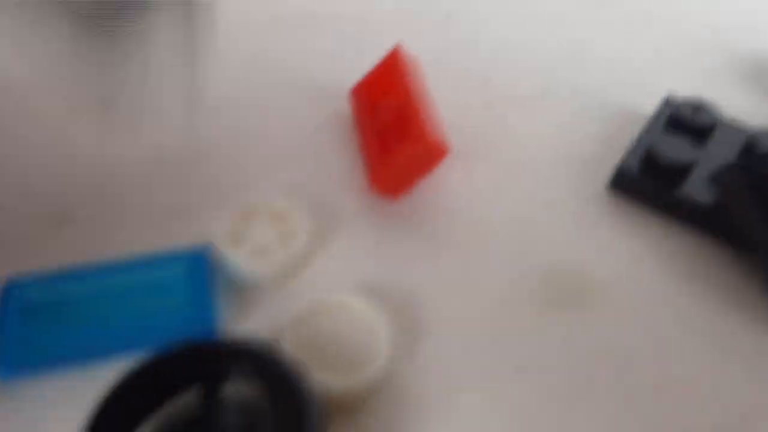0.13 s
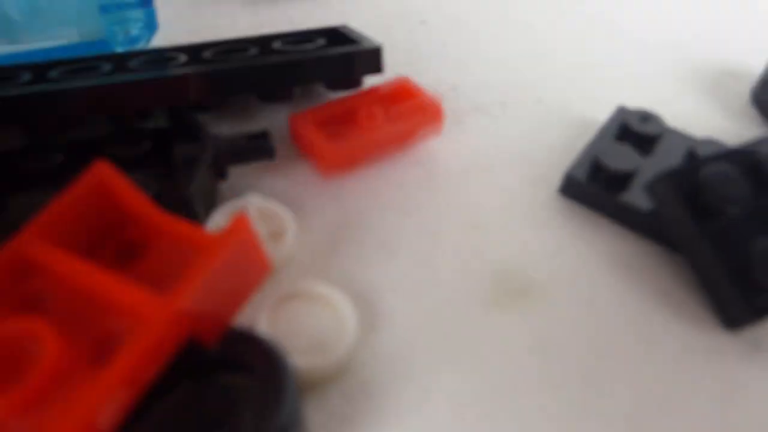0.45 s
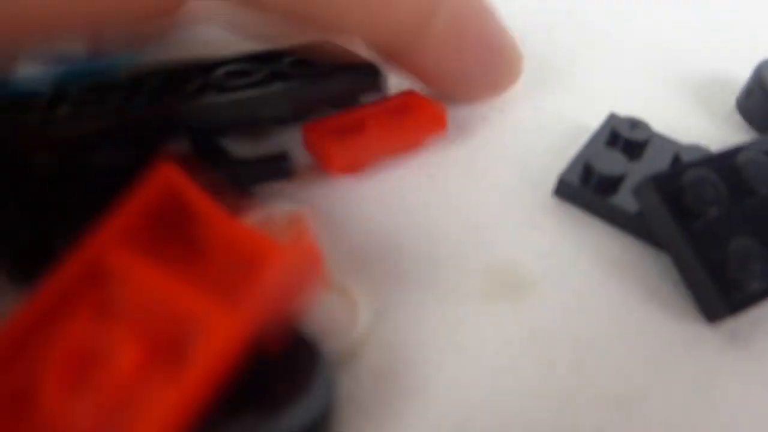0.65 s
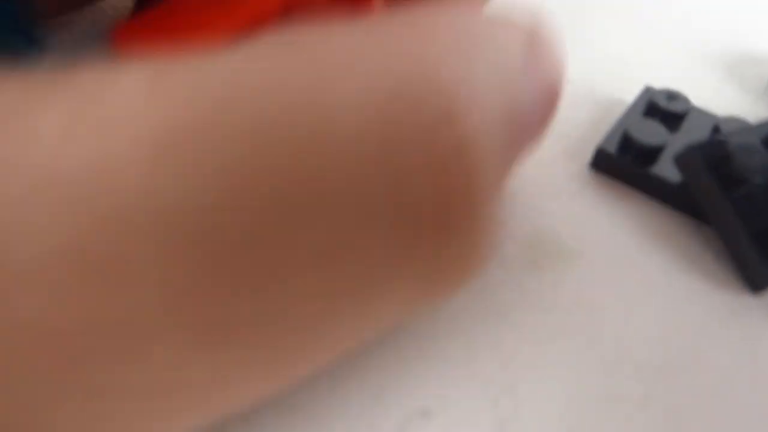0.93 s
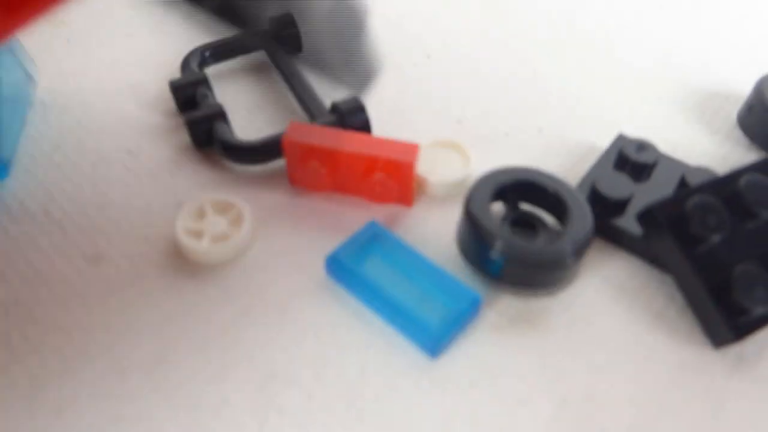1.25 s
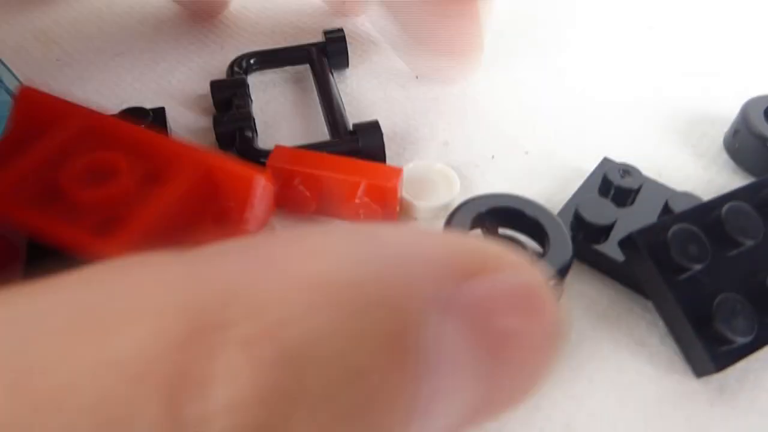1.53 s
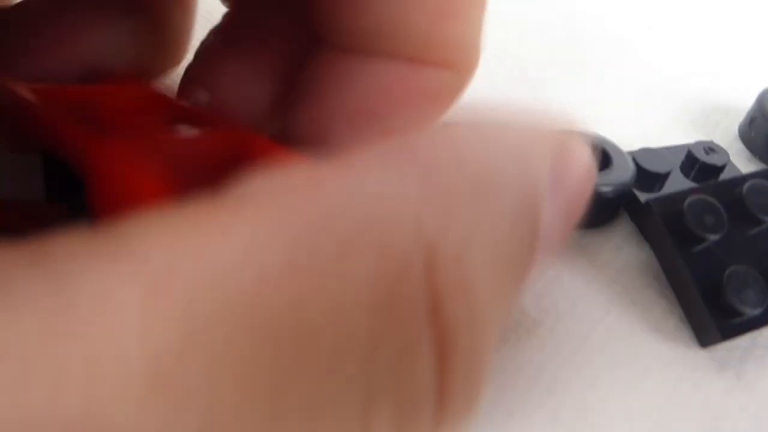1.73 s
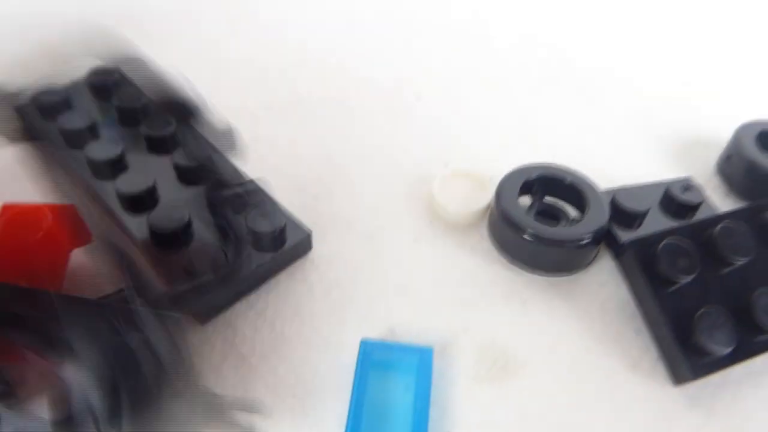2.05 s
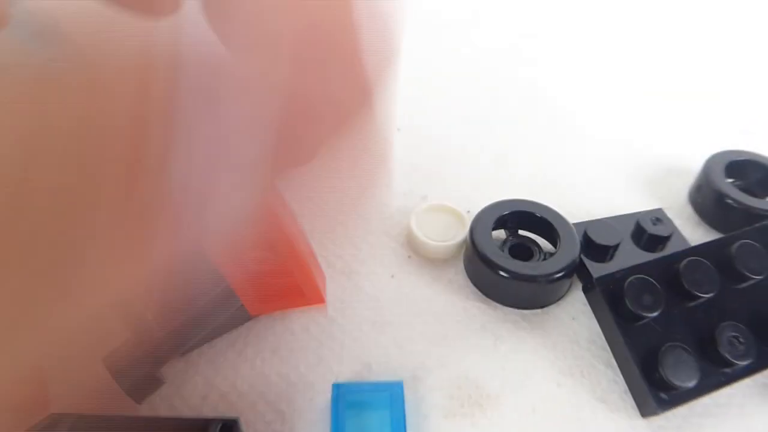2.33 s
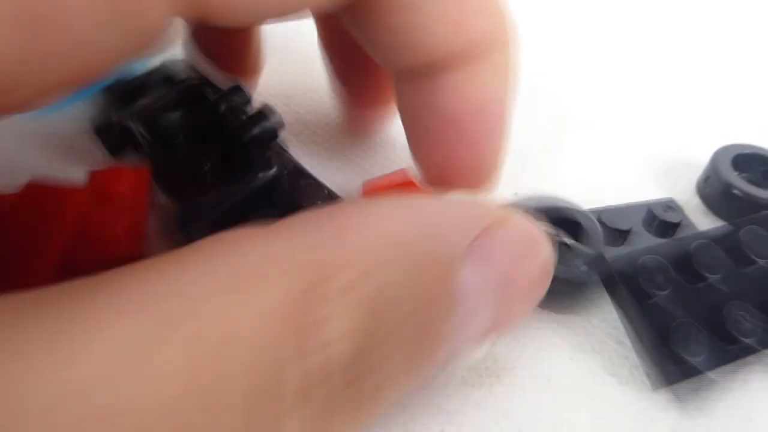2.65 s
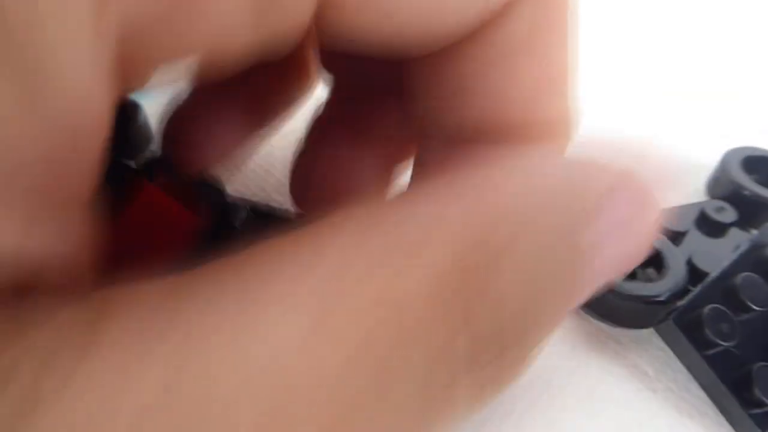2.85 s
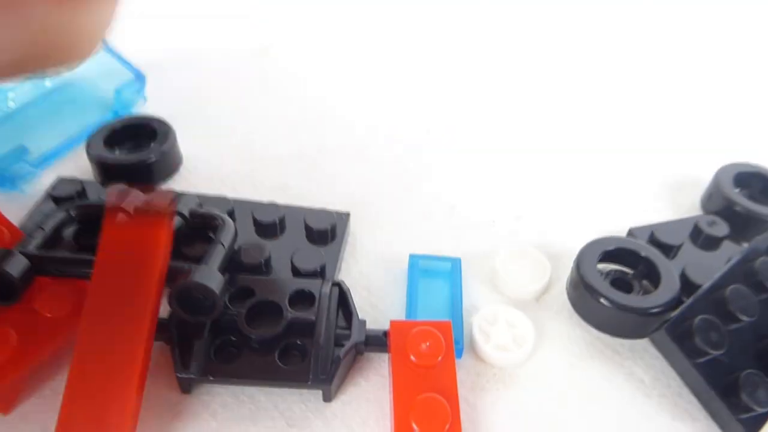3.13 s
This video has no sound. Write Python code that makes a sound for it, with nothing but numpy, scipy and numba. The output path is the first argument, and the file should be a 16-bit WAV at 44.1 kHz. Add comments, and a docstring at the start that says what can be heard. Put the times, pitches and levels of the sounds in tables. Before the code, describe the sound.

Loose hard plastic toy bricks rattle and clink as a hand rakes them over a table

```python
"""A brief patter of small plastic ticks over the rumble and hiss of a quiet room, then bright clinks and knocks:
a hand rakes loose hard plastic bricks over a table just in front of a small camera with two microphone ports.
Noise bursts make the cracks, slaps and scrapes; decaying modes ring the studs, shells, long plate and table top.
Tumbles set off swarms of ticks and slips, and the room is filtered noise plus a short noise-tail echo."""
import sys
import numpy as np
from scipy import signal
from scipy.fft import rfft, irfft
from scipy.io import wavfile
from scipy.ndimage import uniform_filter1d
from numba import njit

SR = 44100
rng = np.random.default_rng(int(sys.argv[2]) if len(sys.argv) > 2 else 0)


def field_ratio(decibels):
    """Amplitude ratio for a level in dB (20 dB per decade); scalars and array-likes work."""
    return 10 ** (np.asarray(decibels, dtype=float) / 20)


def master(y):
    """Save y as 16-bit WAV."""
    cut = np.clip(np.atleast_2d(y).T, -1, 1)
    pcm = np.round(cut * 32767)  # scale
    wavfile.write(sys.argv[1], SR, pcm.astype(np.int16))


N = 145530  # samples, 3.3 s

PAN_DB = -0.5  # usual left minus right level of the bricks and plate


def log_hz():
    """Log frequency of each FFT bin, offset by 1 Hz so that the lowest bin is finite."""
    return np.log(np.fft.rfftfreq(N, 1 / SR) + 1)


def shaped(x, gain):
    """Filters by a gain for each frequency."""
    return irfft(rfft(x) * gain, N)


# Quiet room around the table. Each row: frequency in Hz, relative spectral level in dB per Hz.
ROOM_TONE = [(40, -3.5), (175, -17.5), (1400, -24.5), (2630, -28), (11000, -30), (13000, -34)]


def room():
    """Steady low rumble and hiss: coloured noise, mostly alike left and right."""
    level_db = -53  # rms at the ports
    hz, db = np.array(ROOM_TONE).T
    mid, side = rng.standard_normal((2, N))
    noise = np.array([mid + 0.5 * side, mid - 0.5 * side])
    noise = shaped(noise, field_ratio(np.interp(log_hz(), np.log(hz), db)))
    return noise / np.std(noise) * field_ratio(level_db)


def band(x, lo_hz, hi_hz):
    """Band-pass with gentle slopes."""
    return signal.sosfilt(signal.butter(2, [lo_hz, hi_hz], "band", fs=SR, output="sos"), x)


def sides(db, pan_db):
    """Left and right gains; pan_db is left minus right."""
    pan_db = pan_db + 0 * db
    return field_ratio(db + np.array([pan_db, -pan_db]) / 2)


def blows(times, gains, length_s, size=160):
    """Each contact is a short rough noise burst that swells and dies; gains is channels x events."""
    n = np.arange(size)
    swell = 1 - np.exp(-n / (0.5 * length_s * SR))
    push = rng.standard_normal((len(times), size)) * np.exp(-n / (length_s * SR)) * swell
    out = np.zeros((2, N + size))
    at = np.clip((times * SR).astype(int), 0, N - 1)[:, None] + n
    for c in range(2):
        np.add.at(out[c], at, push * gains[c][:, None])
    return out[:, :N]


@njit
def chime(out, at, pole, rise, left, right):
    """Decaying modes, each a rotating complex pole, that swell in over a short contact."""
    for e in range(len(at)):
        z, s = 1. + 0j, 1.
        for i in range(at[e], len(out[0])):
            z, s = z * pole[e], s * rise
            out[0, i] += left[e] * z.imag * (1 - s)
            out[1, i] += (right[e] * z).imag * (1 - s)
            if z.real ** 2 + z.imag ** 2 < 1e-5:
                break
    return out


def struck(modes, times, db, pan_db, hz, reach, scatter_db, detune, rise_s):
    """Every blow rings all modes of the thing, most those near its own pitch hz, each a little off tune."""
    t60_scatter, skew_rad = 0.2, 0.45  # log spread of decay times; phase spread of the right at the top mode
    f, mode_db, t60 = np.array(modes).T
    hz = np.full(len(times), hz)
    pan_db = np.full(len(times), pan_db)
    luck_db, luck_hz, luck_t60, luck_skew = rng.standard_normal((4, len(times), len(f)))
    far_db = -np.minimum(20 * (np.log(f / hz[:, None]) / reach) ** 2, 25)
    left, right = sides(db[:, None] + mode_db + far_db + scatter_db * luck_db, pan_db[:, None])
    decay = np.log(1000) / (t60 * np.exp(t60_scatter * luck_t60) * SR)
    pole = np.exp(2j * np.pi * f * (1 + detune * luck_hz) / SR - decay)
    right = right * np.exp(1j * skew_rad * luck_skew * f / f.max())
    at = np.repeat(np.clip((times * SR).astype(np.int64), 0, N - 1), len(f))
    rise = np.exp(-1 / (rise_s * SR))
    return chime(np.zeros((2, N)), at, pole.ravel(), rise, left.ravel(), right.ravel())


# In these three, each row: frequency in Hz, relative level in dB, typical full decay t60 in seconds.
# Short rings of brick walls and studs, close to the ports.
STUD_MODES = [(9270, -14, 0.031), (10387, 5.5, 0.014), (10756, 12.5, 0.0039), (11760, 3.5, 0.014)]
# Rings of the hollow brick shells.
SHELL_MODES = [(2840, 1.5, 0.071), (3760, -8.5, 0.034), (4410, -1, 0.062)]
# Modes of a long flat plate among the bricks.
PLATE_MODES = [(3100, -4, 0.14), (5090, -10, 0.15), (5680, 1.5, 0.097), (6654, 2.5, 0.097),
               (8000, 12, 0.035)]


def bricks(times, db, low_db, crack_db, scatter_db):
    """Bricks that meet: a noisy crack, stud rings, and shell and plate modes cut brief."""
    contact_s = 0.00069
    luck_pan, luck_pitch = rng.standard_normal((2, len(times)))
    pan_db = PAN_DB - luck_pan
    high = blows(times, sides(db + crack_db, pan_db), contact_s)
    high = band(high, 4680, 11200)
    low = blows(times, sides(db + low_db + crack_db + 7.5, pan_db), 2 * contact_s, size=320)
    low = band(low, 2940, 10600)
    studs = struck(STUD_MODES, times, db - 8.5, pan_db, hz=11195, reach=0.75,
                   scatter_db=scatter_db, detune=0.0386, rise_s=0.0011)
    brief = [(f, d, 0.3 * t60) for f, d, t60 in SHELL_MODES + PLATE_MODES]
    shells = struck(brief, times, db + low_db - 8.5, pan_db, hz=5000 * np.exp(0.49 * luck_pitch),
                    reach=0.35, scatter_db=scatter_db, detune=0.025, rise_s=0.00093)
    return high + low + studs + shells


def swarm(rate, spread_db):
    """Random contact times, sizes in dB with rare strong ones, and two spare draws from 0 to 1."""
    u = rng.random((int(rate * N / SR), 4))
    size_db = np.minimum(-spread_db * np.log(1 - u[:, 1]), 14)
    return u[:, 0] * N / SR, size_db, u[:, 2], u[:, 3]


# Tumbles of loose bricks under the hand, just in front of the ports.
# Each row: start in seconds, length in seconds, relative dB of the small ticks, relative dB of the table slide.
TUMBLE_TIMES = [(0, 0.018, -32, -52.5), (0.233, 0.15, -27.5, -52), (0.356, 0.1, -32, -40.5),
                (0.472, 0.063, -35.5, -47), (0.646, 0.038, -43, -52), (0.696, 0.046, -33, -40.5),
                (0.747, 0.14, -20.5, -40), (0.904, 0.088, -35, -44), (1.007, 0.12, -31, -38),
                (1.145, 0.12, -25.5, -44), (1.3, 0.085, -41.5, -39.5), (1.397, 0.089, -26.5, -35.5),
                (1.505, 0.18, -32.5, -42), (1.693, 0.14, -25.5, -37.5), (1.834, 0.1, -32.5, -38),
                (1.959, 0.096, -26, -43), (2.055, 0.19, -32.5, -44.5), (2.263, 0.0614, -25.5, -42.5),
                (2.365, 0.099, -33.5, -51), (2.451, 0.12, -43.5, -54.5), (2.562, 0.025, -25.5, -62),
                (2.616, 0.065, -33.5, -40.5), (2.692, 0.22, -28, -37.5), (2.933, 0.096, -26.5, -41),
                (3.03, 0.15, -43.5, -83), (3.188, 0.066, -64, -38.5)]


def tumbling(t, release_s, column):
    """Level in dB at times t: each tumble starts fast, fades while it lasts and dies away."""
    attack_s, fade_db = 0.0022, 2
    rows = np.array(TUMBLE_TIMES)
    age, length = t[:, None] - rows[:, 0], rows[:, 1]
    shape = np.clip(age / attack_s, 0, 1) * np.exp(-np.clip(age - length, 0, 1) / release_s)
    gain = shape * field_ratio(rows[:, column] - fade_db * np.clip(age / length, 0, 1))
    return 20 * np.log10(gain.sum(axis=1) + 1e-6)


# Modes of the table top under the bricks.
# Each row: frequency in Hz, relative level in dB, typical full decay t60 in seconds.
TOP_MODES = [(216, 5, 0.043), (320.8, -6, 0.15), (615, -7.5, 0.088), (883, 1.5, 0.058), (1200, 3.5, 0.038),
             (1648, 2, 0.033)]


def rattle():
    """Swarms of tiny brick contacts, and slips that scrape, rub and ring the top, while bricks tumble."""
    slip_s, slide_release_s = 0.0036, 0.0064
    t, size_db, low, pick = swarm(900, spread_db=3.3)  # possible ticks per second
    db = tumbling(t, 0.004, column=2)
    share = np.interp(db, [-34, -20], [0.4, 1])  # harder tumbles are denser
    db = np.where(pick < share, db - 10 * np.log10(share), -120)
    ticks = bricks(t, db + size_db - 7, low_db=-12 + 8 * low, crack_db=3.4, scatter_db=7.55)

    t, size_db, _, _ = swarm(420, spread_db=2.74)  # possible slips per second
    slide_db = tumbling(t, slide_release_s, column=3) + size_db - 8
    scrape = band(blows(t, sides(slide_db + 18, 0), slip_s, size=640), 233, 1446)
    rub_db = tumbling(t, slide_release_s, column=2) + size_db - 12
    rub = band(blows(t, sides(rub_db, PAN_DB), slip_s, size=640), 1600, 12000)  # plastic drags on plastic
    top = struck(TOP_MODES, t, slide_db - 8, 0, hz=250, reach=30,
                 scatter_db=3, detune=0.07, rise_s=0.0024)
    return ticks + scrape + rub + top


def chatter(times, db, count):
    """A blow is a first contact and a few weaker rebounds, up to 4 ms apart."""
    gap_s = 0.004 * rng.random((len(times), count))
    late = np.cumsum(gap_s, axis=1) - gap_s[:, :1]
    weak_db = -(3 + 12 * rng.random((len(times), count))) * (late > 0)
    return (times[:, None] + late).ravel(), (db[:, None] + weak_db).ravel()


# Knocks on the table top, close by. Each row: start in seconds, relative level in dB.
KNOCK_TIMES = [(0.216, -29.5), (0.265, -20.5), (0.296, -22.5), (0.313, -26), (0.328, -25), (0.661, -31),
               (1.311, -26), (1.425, -20.5), (1.448, -23), (1.706, -35), (2.011, -31), (2.113, -31.5),
               (2.265, -24), (2.289, -30.5), (2.389, -32.5), (2.492, -32), (2.541, -34), (2.573, -20),
               (2.832, -30.5), (2.937, -24.5), (3.208, -27), (3.248, -47.5)]


def knocks():
    """Bricks land on the table top: a dull noise slap and short rings of the top."""
    t, db = chatter(*np.array(KNOCK_TIMES).T, count=3)
    slap = band(blows(t, sides(db + 16.5, 0), 0.0011, size=640), 240, 2160)
    held = [(f, d, 0.64 * t60) for f, d, t60 in TOP_MODES]  # shorter rings than under the slips
    top = struck(held, t, db - 1, 0, hz=850, reach=1.51, scatter_db=3, detune=0.07, rise_s=0.00079)
    return slap + top


# Brick on brick, close to the ports. Each row: start in seconds, relative level in dB.
CLINK_TIMES = [(0.218, -1), (0.251, -5.5), (0.2992, -9), (0.3158, -1.5), (0.3245, -1.5), (0.3376, -2.5),
               (0.394, -3), (0.4455, -7.5), (0.4979, -12.5), (0.764, -11), (0.8148, -6), (0.866, -4),
               (0.876, -7), (0.8834, -11.5), (0.9512, -14.5), (0.975, -15), (1.0372, -10), (1.072, -3),
               (1.1015, -6.5), (1.1593, -3), (1.166, -10), (1.1892, -11), (1.2452, -12.5), (1.2922, -11.5),
               (1.3121, -7.5), (1.4173, -4.5), (1.4416, -5.5), (1.451, -6), (1.48, -1), (1.5575, -15),
               (1.6055, -7), (1.628, -10.5), (1.7069, -6.5), (1.7913, -12.5), (1.836, -14), (1.915, -11),
               (1.9973, -19), (2.01, -8), (2.0207, -5), (2.0317, -5.5), (2.1183, -10), (2.171, -11),
               (2.1885, -7), (2.2665, -3), (2.2907, -11), (2.316, -11), (2.3307, -1), (2.3998, -10),
               (2.497, -10.5), (2.613, -6), (2.7895, -9.5), (2.835, -5), (2.8584, -8), (2.9012, -12),
               (2.9382, -9), (2.9814, -10), (2.9875, 0), (3.1929, -15.5)]
# Brick shells that ring on. Each row: start in seconds, relative level in dB, favoured mode in Hz.
SHELL_RINGS = [(0.221, -35, 2840), (0.835, -26, 2840), (1.411, -26, 2840), (1.455, -25.5, 2840),
               (2.081, -22.5, 3760), (2.223, -26, 4410), (2.172, -18.5, 4410), (2.19, -20.5, 4410),
               (2.308, -27, 2840), (2.71, -27.5, 4410), (2.746, -22, 4410), (3.034, -32, 2840),
               (3.1, -42, 2840)]
# Blows on the long flat plate. Each row: start in seconds, relative level in dB,
# pitch in Hz near which the struck spot favours the modes.
PLATE_HITS = [(0.316, -22, 5670), (.39, -27.5, 5640), (.402, -23, 3100), (1.215, -33, 8400),
              (1.262, -34, 6500), (1.294, -24.5, 8000), (1.313, -21, 6060), (2.268, -21.5, 6100),
              (2.267, -16, 3100), (2.292, -19.5, 6070), (2.321, -20.5, 5700), (2.369, -34, 5700),
              (2.415, -30, 6160), (2.432, -40, 8200), (2.435, -39.5, 3100), (2.496, -44, 6900),
              (2.567, -30, 8200), (3.19, -34.5, 6700)]


def clinks():
    """Bricks strike each other; shells and the long plate ring on, fluttering as they rock on neighbours."""
    scatter_db, flutter_s, flutter_db = 3, 0.003, 3
    t, db = chatter(*np.array(CLINK_TIMES).T, count=3)
    low_db = -12 + 3 * rng.standard_normal(len(t))
    cracks = bricks(t, db, low_db, crack_db=0, scatter_db=scatter_db)
    t, db, hz = np.array(SHELL_RINGS).T
    shells = struck(SHELL_MODES, t, db, PAN_DB, hz, reach=0.05,
                    scatter_db=0, detune=0.0058, rise_s=0.00036)
    t, db, hz = np.array(PLATE_HITS).T
    t, db = chatter(t, db, count=2)
    plate = struck(PLATE_MODES, t, db, PAN_DB, np.repeat(hz, 2), reach=0.33,
                   scatter_db=scatter_db, detune=0.0048, rise_s=0.00052)
    width = int(flutter_s * SR)
    rock = uniform_filter1d(uniform_filter1d(rng.standard_normal(N), width), width)
    return cracks + (shells + plate) * field_ratio(flutter_db * rock / rock.std())


def echo(near):
    """Short room echo: the near sound convolved with a decaying noise tail, wider in the treble."""
    t60_s, level_db = 0.08, -14
    n = np.arange(SR // 4)
    fade = np.exp(-np.log(1000) * n / (t60_s * SR)) * (n > 0.002 * SR)  # begins after 2 ms
    mid, side = rng.standard_normal((2, len(n))) * fade
    side = band(side, 1200, 15000)
    tail = np.array([mid + side, mid - side]) / np.sqrt(2 * np.sum(mid ** 2))
    return field_ratio(level_db) * signal.fftconvolve(near, tail, axes=1)[:, :N]


def scene():
    """Bricks close by, their short echo and the quiet room."""
    near = rattle() + knocks() + clinks()
    return near + echo(near) + room()


# The two microphone ports of the small camera.
# Each row: frequency in Hz, left minus right level in dB, phase in radians by which the left leads.
PORT_RESPONSE = [(200, -1.5, 0.15), (646, -6.5, 0.26), (1250, -3, 1.27), (2640, 2.5, 0.79), (12000, 3, 0.4)]


def ports(dry):
    """Two ports with opposite halves of their difference in colour and phase."""
    hz, db, lead = np.array(PORT_RESPONSE).T
    colour = field_ratio(np.interp(log_hz(), np.log(hz), db) / 2)
    half = colour * np.exp(0.5j * np.interp(log_hz(), np.log(hz), lead))
    return shaped(dry, np.array([half, 1 / half]))


def low_pass(x):
    """Removes everything above the highest recorded frequency."""
    return signal.sosfilt(signal.butter(12, 16470, fs=SR, output="sos"), x)


def record(dry):
    """The camera's two ports, a low cut, clipping at full scale and a treble roll-off."""
    x = ports(dry)
    x = signal.sosfilt(signal.butter(3, 140, "high", fs=SR, output="sos"), x)
    x = np.clip(x, -1, 1)
    x = signal.sosfilt(signal.butter(8, 13000, fs=SR, output="sos"), x)
    return low_pass(x)


dry = scene()
out = record(dry)
master(out)
```